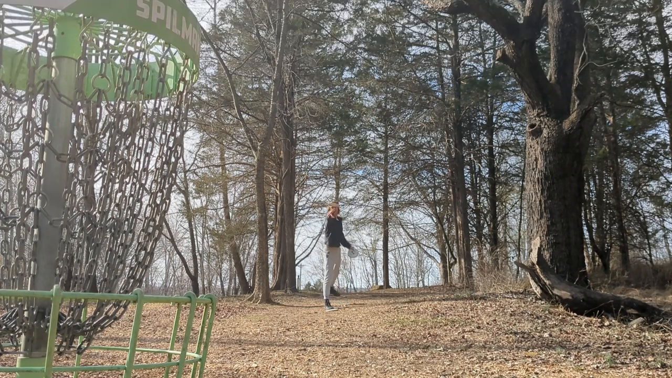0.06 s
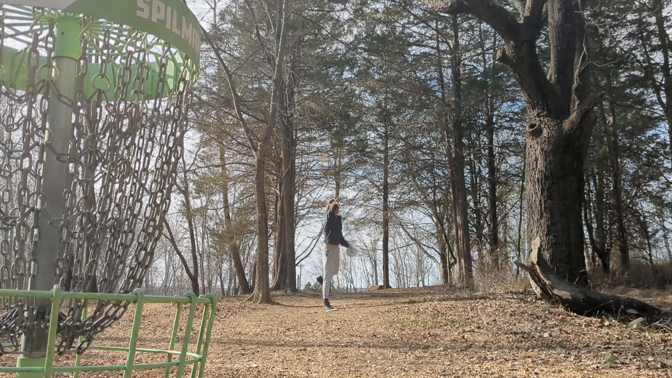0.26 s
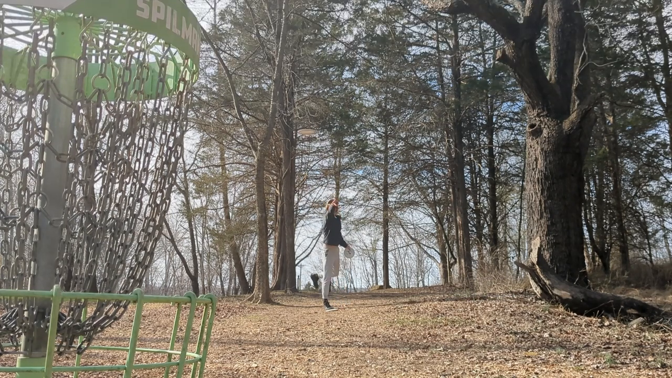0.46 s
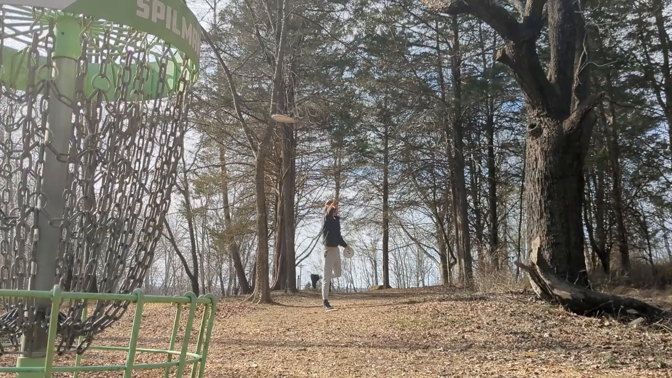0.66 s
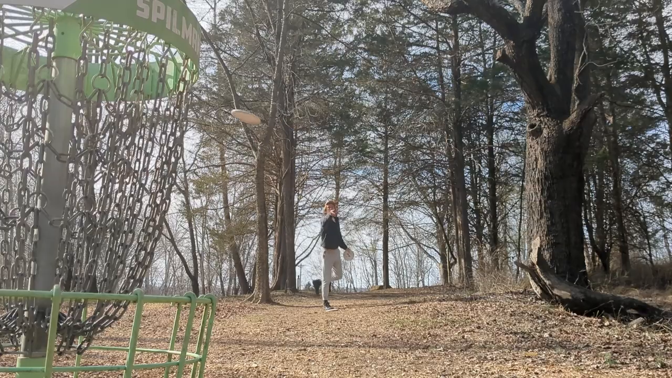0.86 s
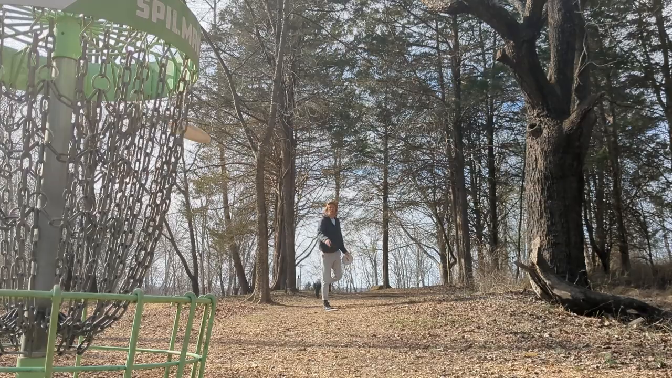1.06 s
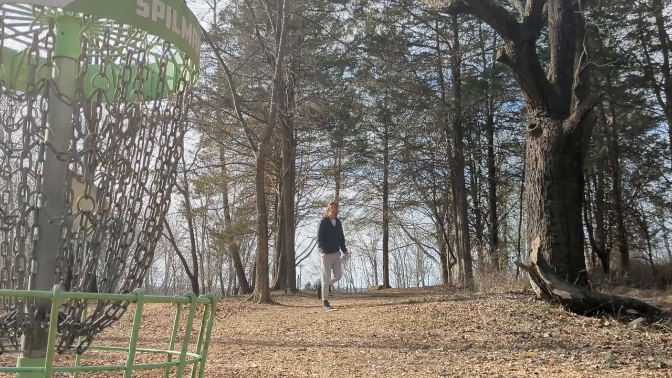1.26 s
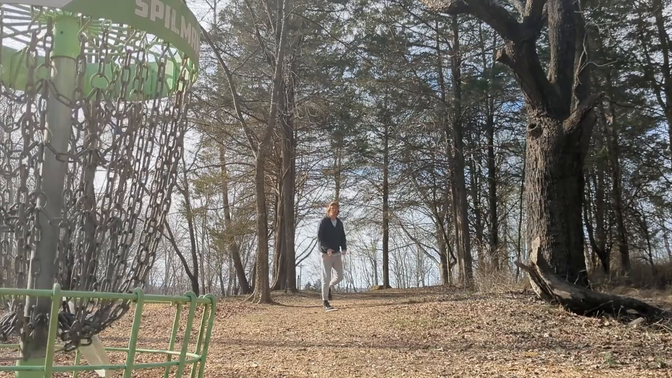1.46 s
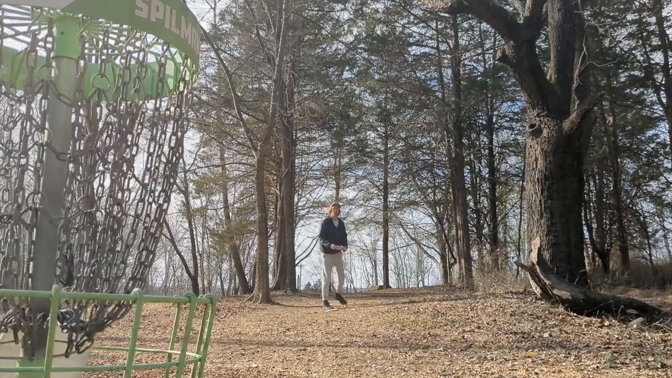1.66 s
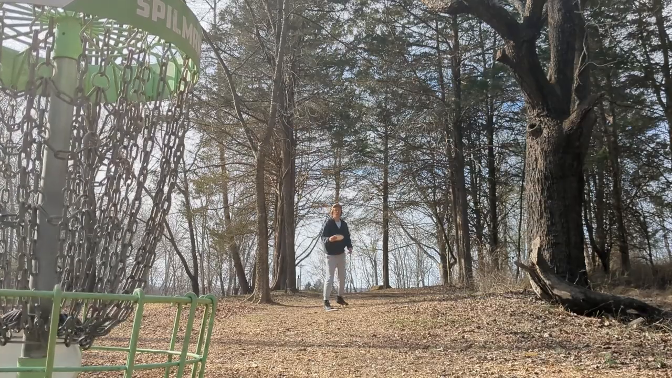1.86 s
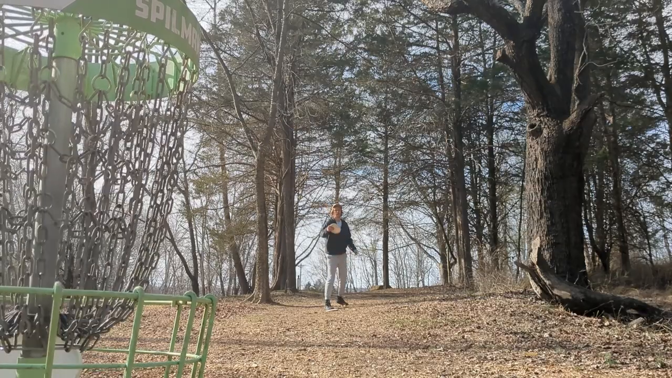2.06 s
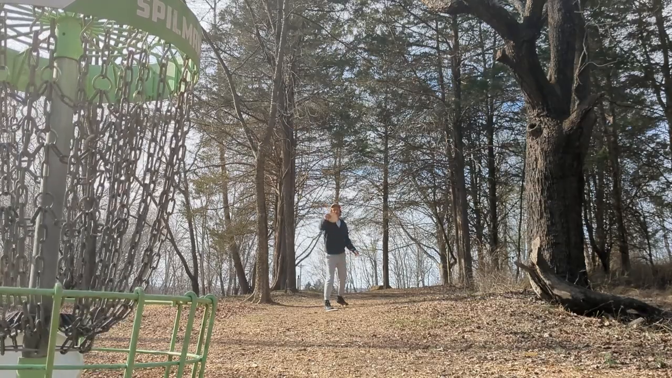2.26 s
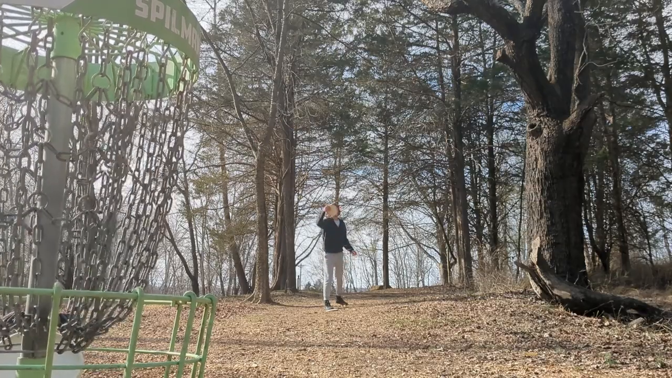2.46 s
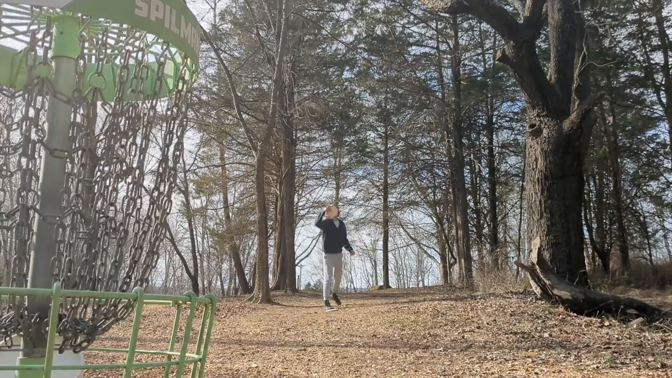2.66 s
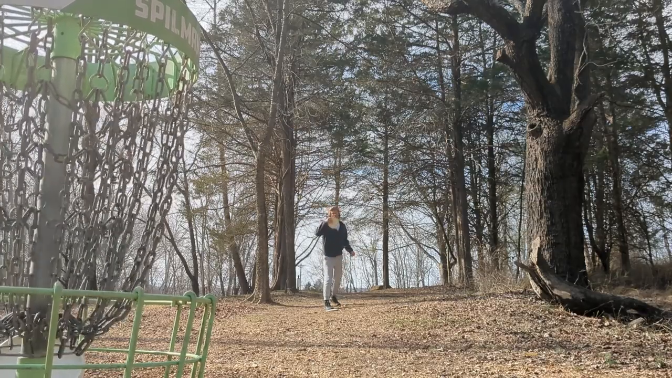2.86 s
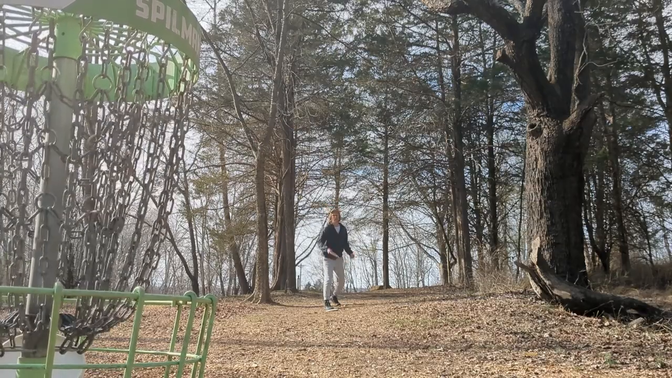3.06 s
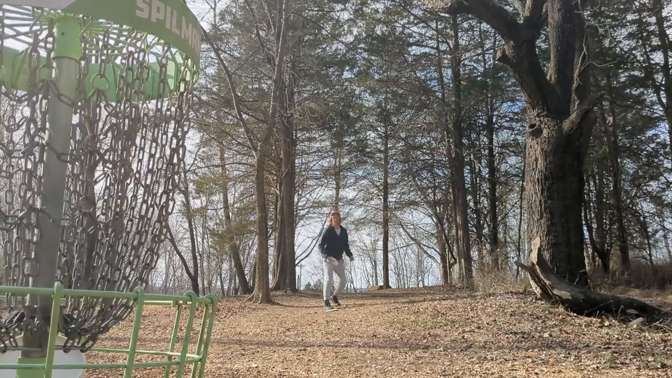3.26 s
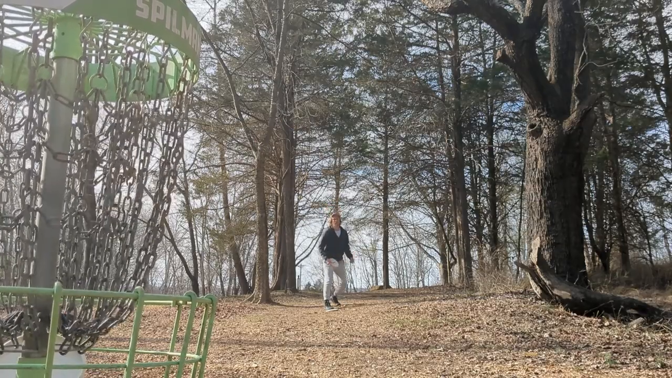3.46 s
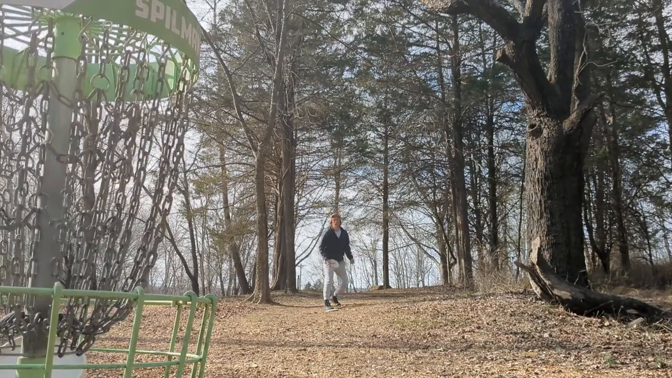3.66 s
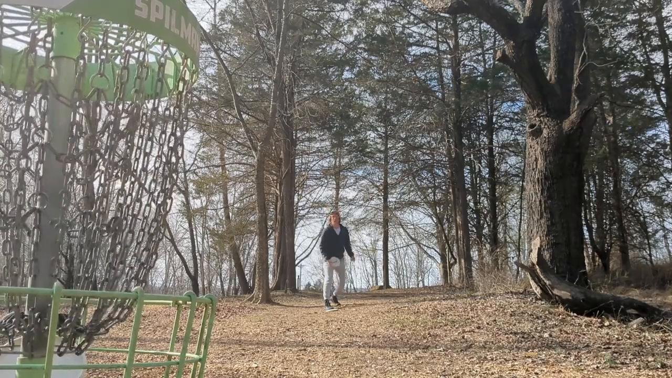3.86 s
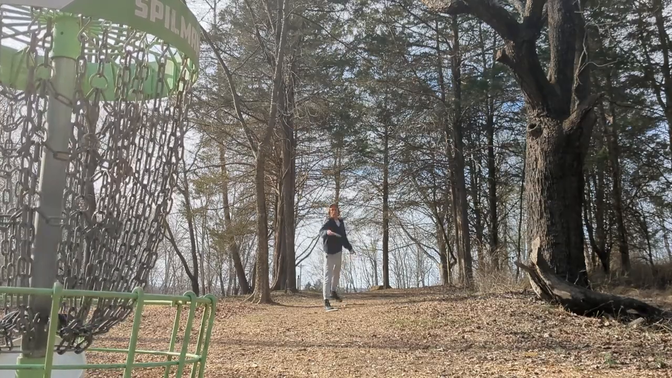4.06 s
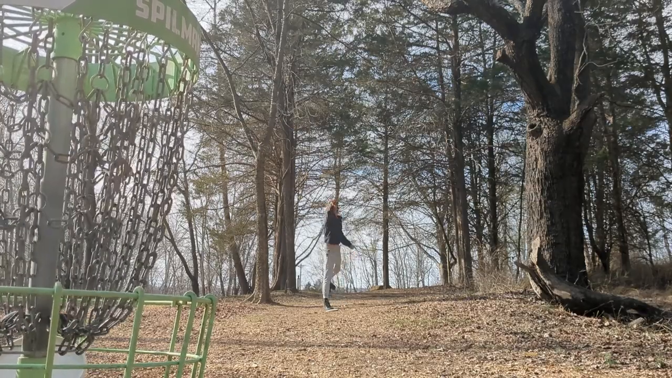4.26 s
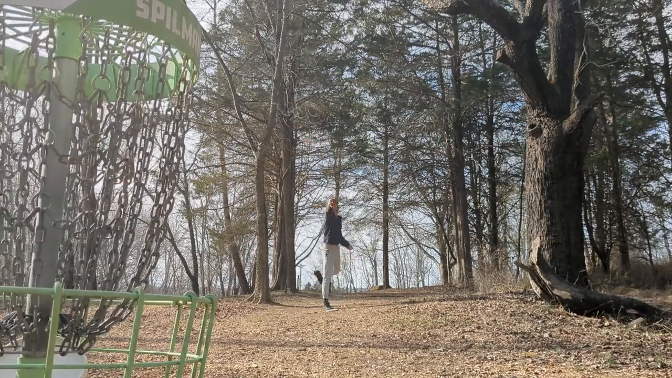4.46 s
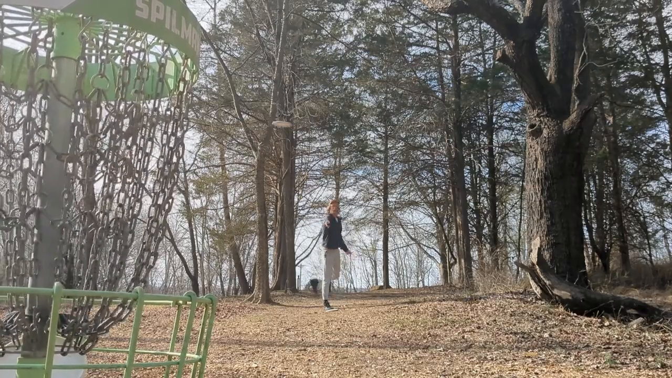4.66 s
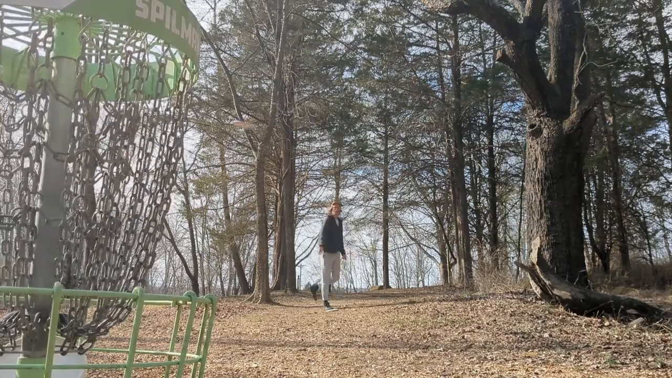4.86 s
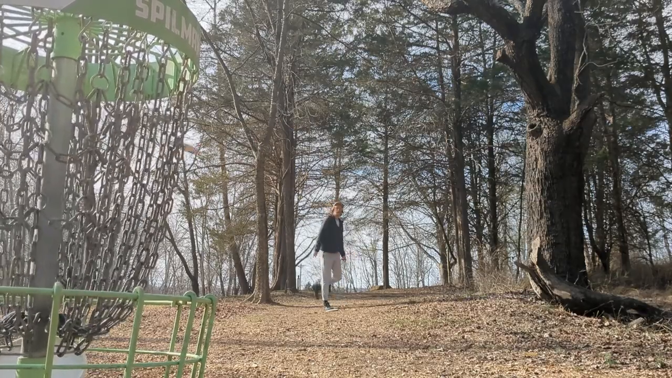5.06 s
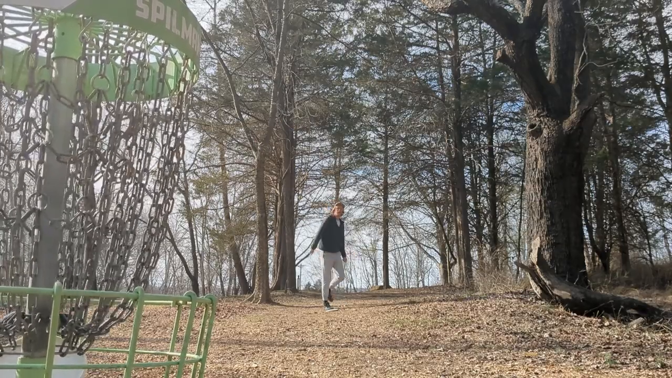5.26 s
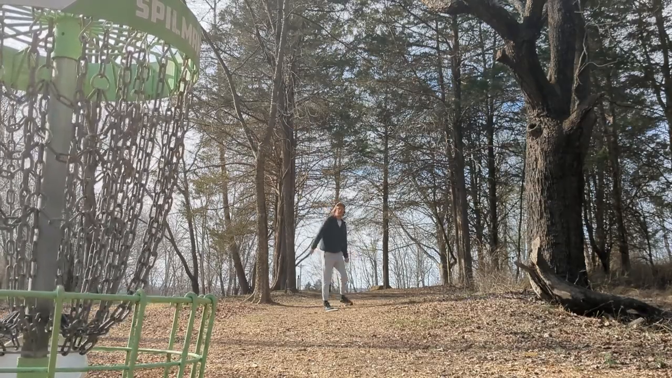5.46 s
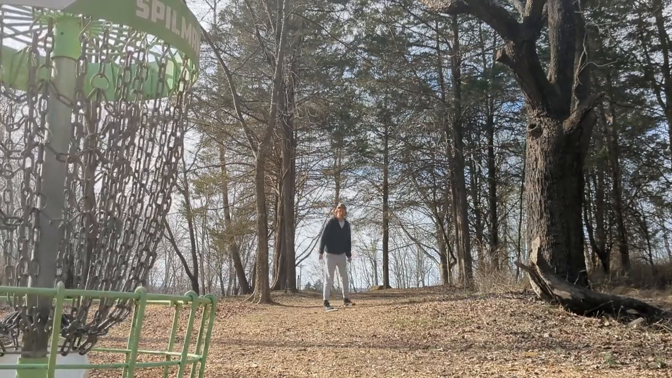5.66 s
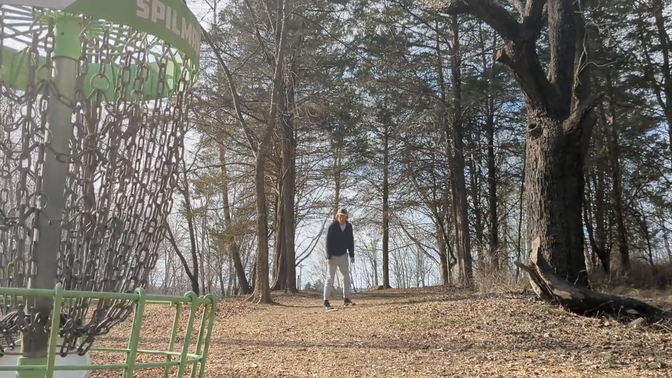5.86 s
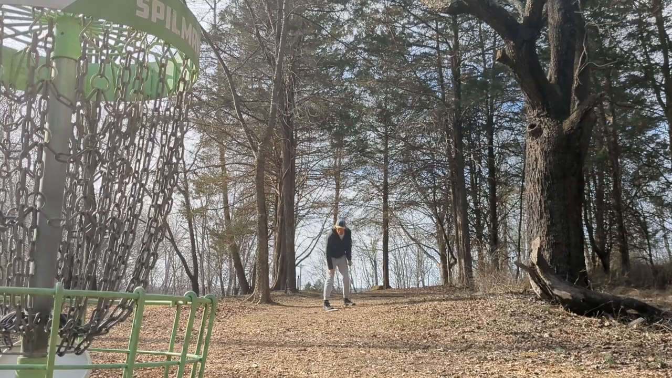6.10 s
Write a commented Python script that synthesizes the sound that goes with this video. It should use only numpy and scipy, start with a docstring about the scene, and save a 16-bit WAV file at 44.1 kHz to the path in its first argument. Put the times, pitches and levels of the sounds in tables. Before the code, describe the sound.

Outdoors over low wind rumble, a thrown disc jangles loudly through metal chains and rattles down; later another bangs off the ringing metal rim.

```python
"""A background of low wind rumble and thin hiss, then a plastic disc crashes into a steel basket's chains.
It drops into the wire cage and wobbles; the links clink on as they swing, and two squeaks slip by.
A second disc clangs on the rim and rattles on the cage. All of it is close, among trees.
Background, slaps and cracks are coloured noise; links, hoop, discs, cage and rim are banks of decaying
sines set off by clicks; the squeaks are wavering tones."""
import sys
import numpy as np
from scipy import signal
from scipy.fft import rfft, irfft, next_fast_len
from scipy.io import wavfile
from scipy.ndimage import uniform_filter1d

SR = 44100
rng = np.random.default_rng(int(sys.argv[2]) if len(sys.argv) > 2 else 0)


def to_wav(sig):
    """Store sig (one row per channel, or 1-D mono) as 16-bit WAV at the path in sys.argv[1].

    Samples outside -1..1 are clipped; the rate is SR.
    """
    pcm = np.clip(np.atleast_2d(sig), -1, 1) * 32767
    pcm = np.round(pcm).astype(np.int16)
    wavfile.write(sys.argv[1], SR, pcm.T)  # frames by channels


N = 270333
TIME = np.arange(N) / SR
PORT_LAG_S = .000225  # typical delay of the left port behind the right


def amp(db):
    """Decibels to gain."""
    return 10 ** (np.asarray(db) / 20)


def rms_one(x):
    """Scale to an rms of 1."""
    return x / np.sqrt(np.mean(x ** 2) + 1e-20)


def at_hz(rows, hz, axis=1):
    """One column of a table, read on a log-frequency axis."""
    rows = np.array(rows)
    return np.interp(np.log(hz + 1), np.log(rows[:, 0]), rows[:, axis])


def coloured(x, spectrum):
    """Give a white signal a spectrum while keeping its power."""
    size = next_fast_len(N + SR // 10)
    hz = np.arange(size // 2 + 1) * SR / size
    gain = rms_one(amp(at_hz(spectrum, hz)))
    return irfft(rfft(x, size) * gain, size)[..., :N]


def clicks(times, sizes):
    """One impulse at each time."""
    out = np.zeros(N)
    places = np.clip(np.round(times * SR).astype(int), 0, N - 1)
    np.add.at(out, places, sizes)
    return out


def ring(drive, hz, t60):
    """A two-pole resonator: a unit click sets a decaying sine of height 1 ringing."""
    radius = amp(-60 / (t60 * SR))
    angle = 2 * np.pi * hz / SR
    poles = [1, -2 * radius * np.cos(angle), radius * radius]
    return signal.lfilter([np.sin(angle)], poles, drive + 1e-18)


def fade(drive, t60):
    """Each click starts an exponential decay."""
    return signal.lfilter([1], [1, -amp(-60 / (t60 * SR))], drive + 1e-18)


def at_ports(parts, spread, left_db, scatter_db, slant=1):
    """Each part reaches the left port a little late, with a lag and balance of its own."""
    out = np.zeros((2, N))
    for part in parts:
        lag_s = PORT_LAG_S * (slant + spread * rng.standard_normal())
        lag = int(round(abs(lag_s * SR)))
        balance_db = left_db + scatter_db * rng.standard_normal()
        left, right = rms_one(amp(np.array([1, -1]) * balance_db / 2))
        out[0, lag:] += left * part[:N - lag]
        out[1] += right * part
    return out


def through(drive, response):
    """Play a signal through a stereo impulse response."""
    return signal.oaconvolve(np.atleast_2d(drive), response, axes=1)[:, :N]


def struck(times, level_db, modes, vary_db):
    """Every blow excites every mode with a slightly different strength."""
    for hz, db, t60 in modes:
        blow_db = level_db + db + rng.normal(0, vary_db, len(times))
        yield ring(clicks(times, amp(blow_db)), hz, t60)


def chime(hz, gain, t60, length_s, spread, scatter_db, size=256):
    """Stereo impulse response of many modes, each with its own phase, lag and balance."""
    pole = 2j * np.pi * hz / SR - np.log(1000) / (t60 * SR)
    lag = PORT_LAG_S * SR * (1 + spread * rng.standard_normal(len(hz)))
    sides = amp(np.outer([1, -1], scatter_db * rng.standard_normal(len(hz))) / 2)
    sides /= np.sqrt(np.mean(sides ** 2, axis=0))
    phase = 2j * np.pi * rng.random(len(hz))
    start = gain * sides * np.exp(phase - pole * np.outer([1, 0], lag))
    # a decaying sine is its value at the start of each block times its course within a block
    blocks = np.exp(np.outer(np.arange(0, length_s * SR, size), pole))
    within = np.exp(np.outer(pole, np.arange(size)))
    return ((start[:, None] * blocks) @ within).imag.reshape(2, -1)


def background():
    """A background of low wind rumble, nearly alike at both ports, and thin hiss."""
    # background levels over time: start_s, rumble level_db, hiss level_db
    background_levels = [(0, -52.5, -72), (.5, -50.5, -73), (3.4, -57, -65.5), (4.2, -58.5, -68),
                         (6.13, -54.5, -66)]
    # its two colours: pitch_hz, relative level_db per Hz
    rumble_colour = [(25, -12.5), (62, -1.5), (95, 1.5), (130, -6), (200, -12.5), (500, -41), (1500, -70)]
    hiss_colour = [(200, -6), (1200, -0.5), (1800, -14), (4000, -14.5), (8000, -14.5), (12000, -7.5)]
    s, *levels = np.transpose(background_levels)
    rumble, hiss = (amp(np.interp(TIME, s, db)) for db in levels)
    # one noise shared by the ports plus one for each alone
    low = rng.standard_normal(N) + amp(-15.5) * rng.standard_normal((2, N))
    high = amp(-8.0) * rng.standard_normal(N) + rng.standard_normal((2, N))
    return rumble * coloured(low, rumble_colour) + hiss * coloured(high, hiss_colour)


def jostle(start_s, hold_s, release_db_per_s, per_s, ring_db, tick_db, uneven_db=3.0):
    """Random link contacts that hold their power for a while, then die away: ring and tick drives."""
    sizes = amp(uneven_db * rng.standard_normal(N)) * rng.choice([-1, 1], N)
    contacts = rms_one(sizes * (rng.random(N) < per_s / SR))
    release_db = -release_db_per_s * np.maximum(TIME - start_s - hold_s, 0)
    envelope = (TIME >= start_s) * amp(release_db)
    return amp([[ring_db], [tick_db]]) * envelope * contacts


def showers(rows, trail_s, follow_db, count=22):
    """Each meeting of chains is one firm contact and a dying shower of others: ring and tick drives."""
    s, ring_db, tick_db = np.transpose(rows)
    delay = rng.exponential(1, (len(s), count))  # in units of trail_s
    sizes = amp(follow_db) * rng.standard_normal(delay.shape) * np.exp(-delay / 2)
    delay[:, 0], sizes[:, 0] = 0, 1
    sizes /= np.linalg.norm(sizes, axis=1, keepdims=True)
    times = s[:, None] + trail_s * delay
    return np.array([clicks(times, sizes * amp(db)[:, None]) for db in (ring_db, tick_db)])


SWING_START_S = 1.87  # the freed strands start to swing


def firm_clinks():
    """Whole strands meet, weaker as the swing dies: rows of start_s, ring_db, tick_db."""
    # when the strands meet: start_s
    clink_times = [2.165, 2.2715, 2.376, 2.5531, 2.613, 2.945, 3.314, 3.381, 3.684, 4.181, 4.5058, 4.661,
                   5.124]
    swing_db, fall_db_per_s = 7.5, 9
    db = swing_db - fall_db_per_s * (np.array(clink_times) - SWING_START_S)
    return np.column_stack([clink_times, db, db - 19.5])


def light_clinks(count=32):
    """Single links touch by chance, crowded then ever sparser: rows of start_s, ring_db, tick_db."""
    span_s, crowding = 3.7, 1.5
    fall_db_per_s, vary_db = 9.5, 4
    age = span_s * ((np.arange(count) + rng.random(count)) / count) ** crowding
    db = -fall_db_per_s * age + vary_db * rng.standard_normal(count)
    return np.column_stack([SWING_START_S + age, db, db - 12])


def links(drive, count=7, size=5):
    """Each contact rings one strand of neighbouring links, all at slightly different pitches."""
    # modes of a chain link: pitch_hz, scatter_hz from link to link, relative level_db, t60_s
    link_modes = [(9376, 610, -23.5, 0.1), (9850, 360, -16, 0.11), (11765, 410, -17.5, .16),
                  (13830, 160, 3, .15), (14950, 160, -4, 0.21), (15380, 33, -10, 0.083)]
    hz, scatter, db, t60 = np.tile(link_modes, (size, 1)).T
    gain = amp(db) / np.sqrt(t60 * SR)  # level_db sets energy, whatever the decay
    dealt = rng.integers(0, count, N)  # which strand each sample's contact goes to
    out = 0
    for k in range(count):
        pitches = hz + scatter * rng.standard_normal(len(hz))
        strand = chime(pitches, gain, t60, t60.max(), spread=0.49, scatter_db=3.5)
        out = out + through(drive * (dealt == k), strand)
    return out


def link_ticks(ticking):
    """Each contact gives a broad tick, and neighbouring links buzz briefly after it."""
    t = TIME[:SR // 10]
    decay = np.exp(-t / 0.002) + amp(-8.5) * np.exp(-t / 0.02)
    buzz = rng.standard_normal((2, len(t))) * decay
    buzz /= np.linalg.norm(buzz, axis=1, keepdims=True)
    ticks = amp(-10) * at_ports([ticking], spread=0, left_db=5.0, scatter_db=5.5)
    ticks += amp(-1.5) * through(ticking, buzz)
    # pitch_hz, relative level_db per Hz
    colour = [(300, -13.5), (1500, -8.0), (2700, -10.0), (3900, 2.0), (6000, -1),
              (8000, -2.0), (10500, 7), (12800, -1.5), (15500, -5.0)]
    return coloured(ticks, colour)


def chains():
    """Steel links meet: small stiff loops ring in the high treble and tick at every contact."""
    # the chains thrash while they hold the disc, shiver once it drops, then settle:
    # start_s, hold_s, release_db_per_s, contacts per s, relative ring_db, relative tick_db
    jostles = [(1.281, .25, 160.5, 800, -13.5, -23), (1.725, 0.031, 27, 91, -25, -37),
               (2.793, 2.2, 32, 50, -68, -72)]
    # a disc strikes or grazes the chains: start_s, relative ring_db, relative tick_db
    crashes = [(1.285, 14.5, 18), (1.315, 14.5, 11.5), (1.3439, 22.5, 0), (1.6458, 11.5, 0),
               (1.7252, 20, 9), (5.8441, -30, -6), (5.904, -28, -13), (6.1137, -42, -13.5)]
    drives = sum(jostle(*row) for row in jostles)
    drives = drives + showers(crashes, trail_s=.015, follow_db=-4)
    drives += showers(firm_clinks(), trail_s=.013, follow_db=-11)
    drives += showers(light_clinks(), trail_s=.0052, follow_db=-10)
    ringing, ticking = drives
    return links(ringing) + link_ticks(ticking)


def wobble(count=60):
    """A landed disc's edge touches the cage ever faster and softer: rows start_s, clack_db, knock_db."""
    # start_s, length_s, first_gap_s, last_gap_s, fall_db_per_s, relative clack_db, relative knock_db
    wobbles = [(1.783, 1.2, .05, 0.024, 21.5, -30.5, -40), (5.49, 0.57, .048, .028, 3.5, -26.5, -38)]
    jitter = 0.22  # share of a gap
    for start_s, length_s, first_gap_s, last_gap_s, fall_db_per_s, clack_db, knock_db in wobbles:
        age = 0
        for early in rng.standard_normal(count):
            gap = np.interp(age, [0, length_s], [first_gap_s, last_gap_s])
            db = -fall_db_per_s * age
            if age < length_s:
                yield start_s + age + jitter * gap * early, clack_db + db, knock_db + db
            age += gap


def disc():
    """Plastic gives a slap, a hollow knock and a low thump as the whole disc flexes."""
    # knocks of the discs: start_s, relative knock_db, relative flex thump_db
    knocks = [(1.287, -20.5, -50), (1.324, -20, -38.5), (1.545, -18.5, -34.5), (1.642, -28, -44),
              (1.694, -17.5, -52.5), (5.405, -21, -32.5), (5.446, -20, -25.5), (5.571, -28, -34),
              (5.85, -46, -40)]
    # modes of a disc: pitch_hz, relative level_db, t60_s
    disc_modes = [(377, -7, 0.035), (475.8, -3, 0.08), (633.5, -10.5, 0.021), (872, -9, 0.048),
                  (1280, -7, 0.04)]
    # slap of plastic on steel, and a wobble's clack: pitch_hz, relative level_db per Hz
    slap_colour = [(100, -13), (400, -5), (1100, 2), (2000, -7.5), (9000, -34)]
    clack_colour = [(200, -3.5), (450, -19), (900, -0.5), (1500, 1), (2400, -10), (8000, -31)]
    # each knock is followed 15 ms later by one 10 dB softer
    rebounds = np.add(knocks, [0.015, -10, -10])
    s, knock_db, flex_db = np.vstack([knocks, rebounds]).T
    touch_s, clack_db, touch_db = np.transpose(list(wobble()))
    modes = struck(np.append(s, touch_s), np.append(knock_db, touch_db), disc_modes, vary_db=1.0)
    knock = sum(mode * (-1) ** k for k, mode in enumerate(modes))  # alternating polarity
    slap_fade = fade(clicks(s, amp(knock_db)), t60=0.074)
    slap = amp(-3.0) * coloured(rng.standard_normal(N), slap_colour) * slap_fade
    clack_fade = fade(clicks(touch_s, amp(clack_db)), t60=0.039)
    clacks = coloured(rng.standard_normal(N), clack_colour) * clack_fade
    flex = ring(clicks(s, amp(flex_db)), hz=126.3, t60=0.15)
    # the second disc's heavy, dull landing
    thud = ring(clicks(np.array([5.571]), amp(-11)), hz=292, t60=0.013)
    # keep the thumps free of deep bass below their pitch
    thin_bass = signal.butter(1, 110, "high", fs=SR, output="sos")
    thumps = amp(4.5) * signal.sosfilt(thin_bass, flex + thud)
    return at_ports([knock + slap + thumps + clacks], spread=0, left_db=1.65, scatter_db=1.0)


def frame(count=340):
    """A blow on welded steel cracks, then the many cage wires and the rim ring on."""
    # blows on the frame: start_s, relative cage_db, relative rim_db, relative crack_db
    blow_rows = [(1.287, -51, -62, -43), (1.546, -33.5, -67, -63), (1.696, -28.5, -76, -22.5),
                 (5.405, -28, -42.5, -14.5), (5.446, -24, -33, -9.5), (5.573, -52, -48, -20)]
    # trend of the cage wires' many close modes: pitch_hz, relative level_db, t60_s
    wire_trend = [(333.3, -33.5, 3.4), (450, -26.5, 3.62), (654, -34.5, 3.3), (1200, -29.5, 3.46),
                  (2191, -18, 2.28), (3120, -23, 1.86), (4560, -22, 1.1), (8870, -26, 0.32)]
    # the cage's strongest modes, and those of the rim: pitch_hz, relative level_db, t60_s
    cage_modes = [(453, -18.5, 2.158), (1414, -18.5, 3.14), (1640, -18, 0.59), (2007, -12, 2.6),
                  (2073, -11.5, 2.6), (3180, -17, 2.2)]
    rim_modes = [(124, -15.5, 1.8), (1560, -5.5, 4.2), (1879, 1.5, 2.8), (2458, 5, 3.3), (2784, -7.5, 1.8),
                 (3064, 5, 0.87), (3280, -5.5, 1.4), (3830, -11.5, 1.8), (4728, -3.5, 1.2), (5075, -8, 1.4)]
    # crack of a hard contact: pitch_hz, relative level_db per Hz
    crack_colour = [(300, -6.5), (1000, -5.5), (2500, 3.5), (4500, -6.5), (7000, -8), (11000, -6.5),
                    (15000, -24.5)]
    s, cage_db, rim_db, crack_db = np.transpose(blow_rows)
    hz = 330 + 8500 * ((np.arange(count) + rng.random(count)) / count) ** 1.3
    gain = amp(at_hz(wire_trend, hz) + rng.normal(0, 1.0, count))
    t60 = at_hz(wire_trend, hz, axis=2)
    wires = chime(hz, gain, t60, t60.max(), spread=0.25, scatter_db=6.5)
    out = through(clicks(s, amp(cage_db)), wires)
    cage = struck(s, cage_db, cage_modes, vary_db=1)
    out += at_ports(cage, spread=.1, left_db=3.0, scatter_db=1.5)
    # the rim lies further to the side, so it reaches the left port later still
    rim = struck(s, rim_db, rim_modes, vary_db=1.5)
    out += at_ports(rim, spread=0, left_db=2.5, scatter_db=3.5, slant=1.076)
    blows = clicks(s, amp(crack_db))
    crack_fade = fade(blows, t60=0.023) + amp(-10.0) * fade(blows, t60=0.27)
    cracks = coloured(rng.standard_normal((2, N)), crack_colour) * crack_fade
    return out + amp(-5.5) * at_ports(cracks, spread=0.18, left_db=2.5, scatter_db=4.5)


def hoop():
    """The chains jerk the steel hoop that gathers them; its upper modes are louder on the left."""
    # blows on the hoop: start_s, relative level_db
    hoop_hits = [(1.38, -21.5), (1.396, -14), (1.418, -25.5), (1.44, -21), (1.465, -25.5), (1.485, -21.5),
                 (1.519, -16.5)]
    # modes of the hoop: pitch_hz, relative level_db, t60_s
    hoop_modes = [(3680, -5.5, 0.23), (3700, -8.5, 0.36), (3754, -8, 0.25), (9040, -12, .2),
                  (9880, -10.5, .2), (10470, -0.5, 0.42), (10400, -1.5, 0.16), (10420, -4.5, .14),
                  (12100, -5, .35)]
    s, db = np.transpose(hoop_hits)
    modes = list(struck(s, db, hoop_modes, vary_db=3.5))
    lower = at_ports(modes[:3], spread=.1, left_db=0.0, scatter_db=5.5)
    upper = at_ports(modes[3:], spread=.2, left_db=11.0, scatter_db=3.0)
    return lower + upper


def squeaks():
    """Links squeak as they turn, steel slipping on steel: a short wavering tone with its octave."""
    # start_s, length_s, pitch_hz, relative level_db
    squeak_rows = [(2.95, .07, 7700, -48), (3.31, .05, 2960, -56)]
    for s, length, hz, db in squeak_rows:
        waver = rms_one(uniform_filter1d(rng.standard_normal(N), size=200))
        phase = 2 * np.pi * np.cumsum(hz * (1 + 0.0059 * waver)) / SR
        swell = np.sin(np.pi * np.clip((TIME - s) / length, 0, 1))
        yield amp(db) * swell * (np.sin(phase) + amp(1) * np.sin(2 * phase))


def trees(x, t60, wet_db):
    """Trunks scatter a faint, dull tail: low-passed noise that swells in and decays."""
    t = TIME[:SR]
    tail = rng.standard_normal((2, len(t))) * amp(-60 * t / t60) * (1 - np.exp(-t / .03))
    tail = signal.sosfilt(signal.butter(1, 3000, fs=SR, output="sos"), tail)
    return amp(wet_db) * through(x, tail / np.linalg.norm(tail[0]))


def scene():
    """The basket among the trees, over the background of rumble and hiss."""
    bed = background()
    basket = chains() + disc() + frame() + hoop()
    basket += at_ports(squeaks(), spread=0, left_db=12, scatter_db=2)
    return bed + basket + trees(basket, t60=2.2, wet_db=-26.0)


def record(dry):
    """The deepest bass is thinned, the highest peaks are rounded and the top is cut."""
    thin = signal.sosfilt(signal.butter(2, 55, "high", fs=SR, output="sos"), dry)
    rounded = 0.93 * np.tanh(thin / 0.94)
    top_cut = signal.ellip(10, .2, 80, 15900, fs=SR, output="sos")  # steep, at 15.9 kHz
    return signal.sosfilt(top_cut, rounded)


dry = scene()
out = record(dry)
to_wav(out)
```